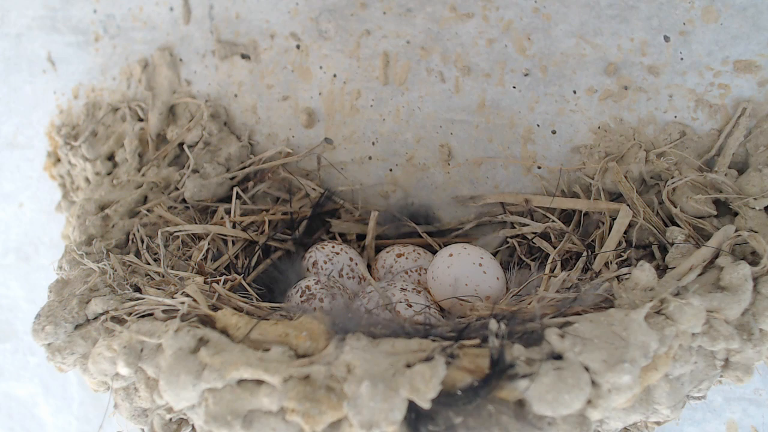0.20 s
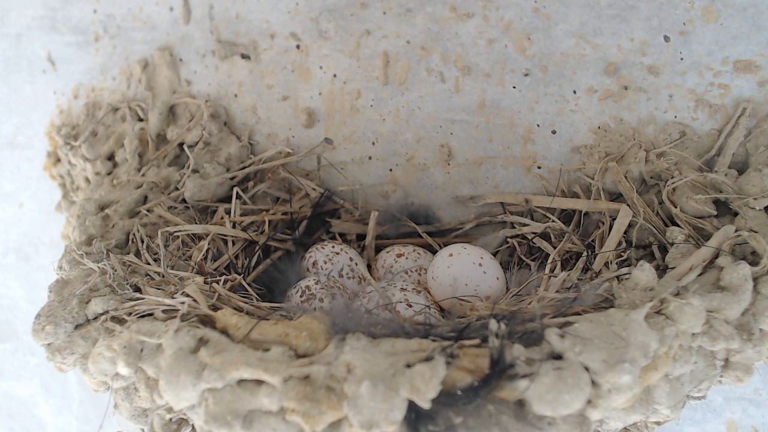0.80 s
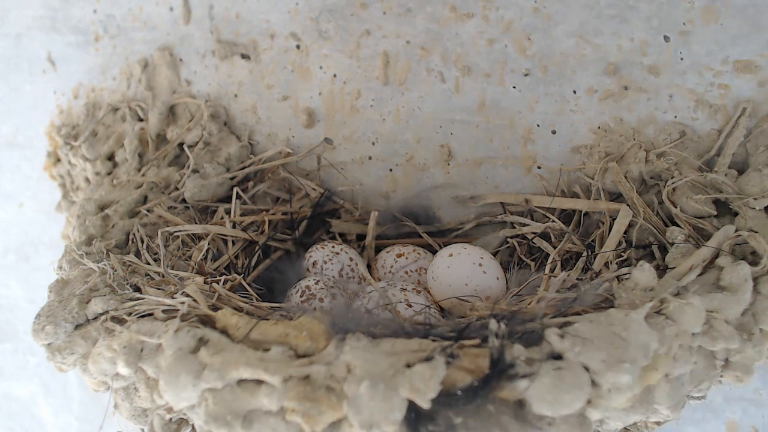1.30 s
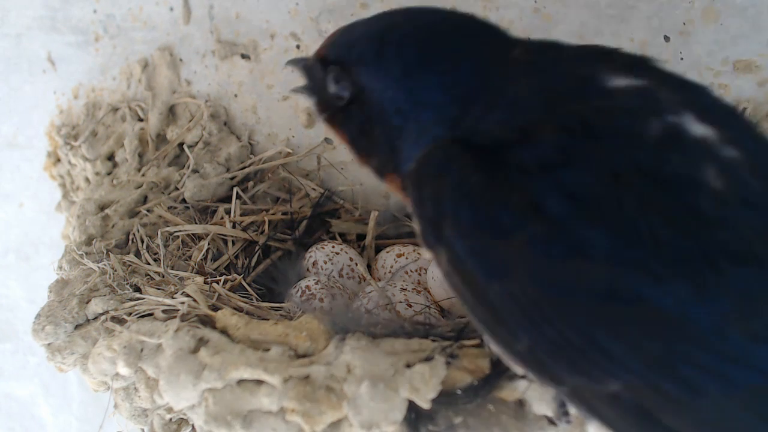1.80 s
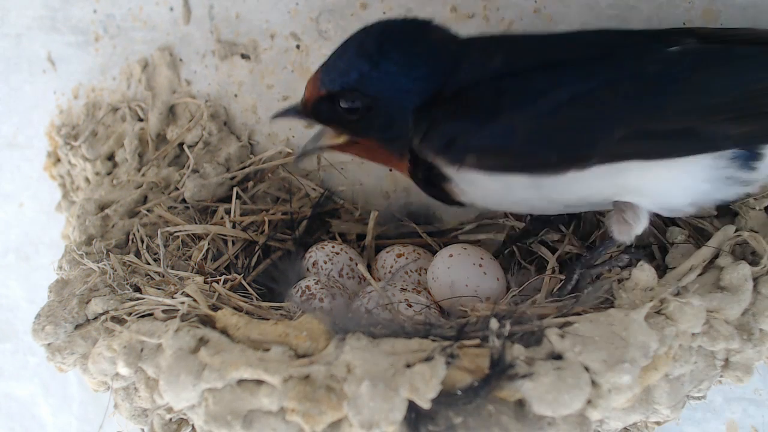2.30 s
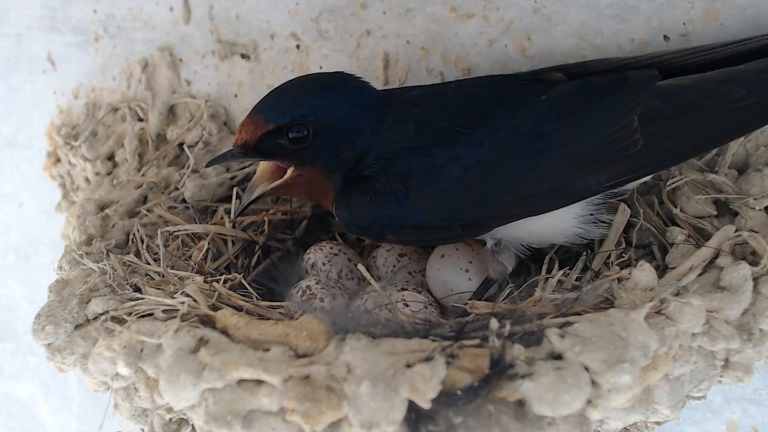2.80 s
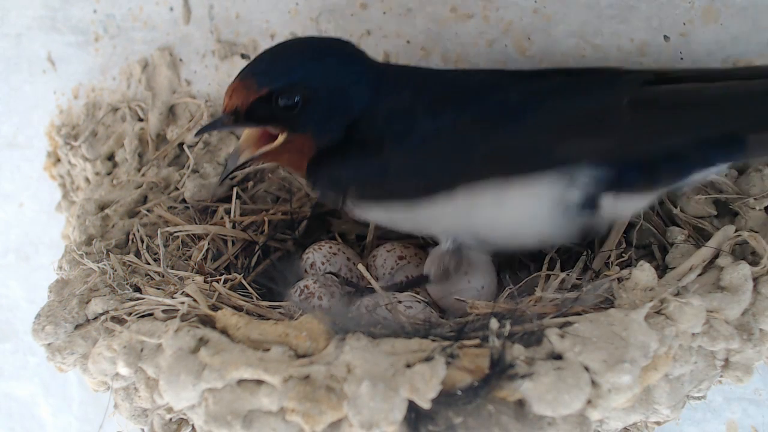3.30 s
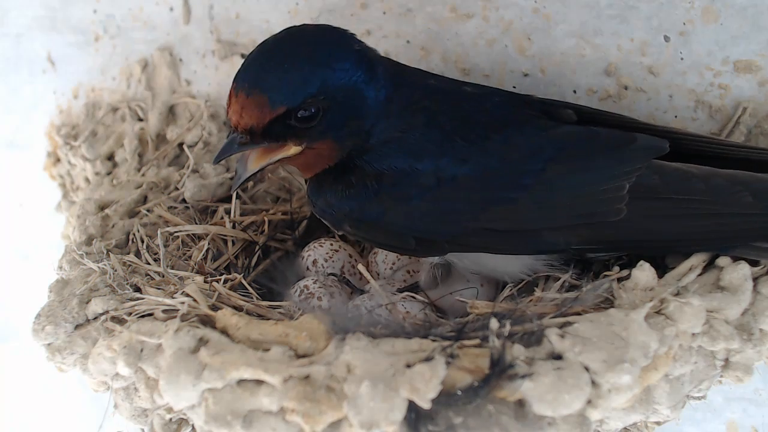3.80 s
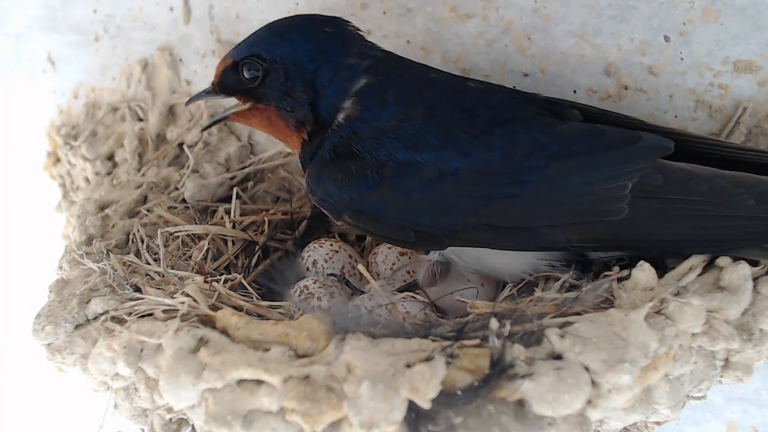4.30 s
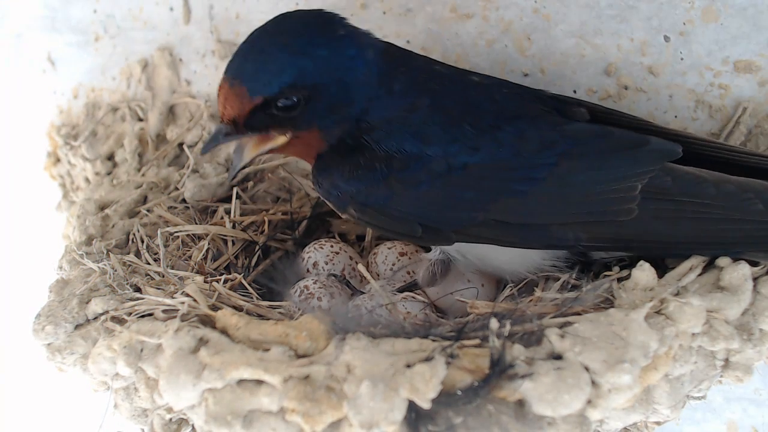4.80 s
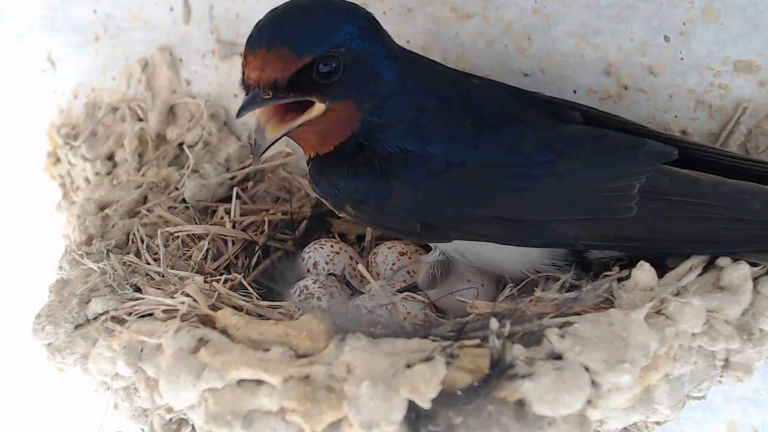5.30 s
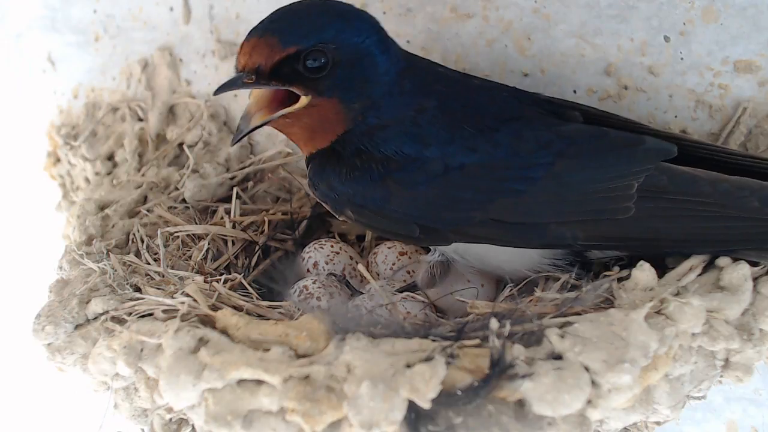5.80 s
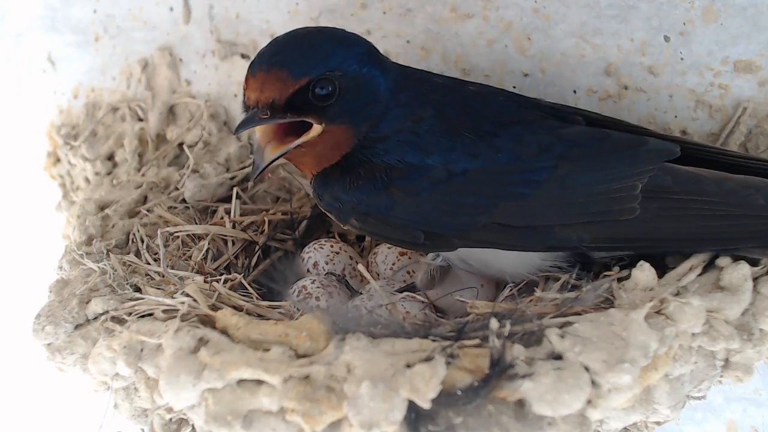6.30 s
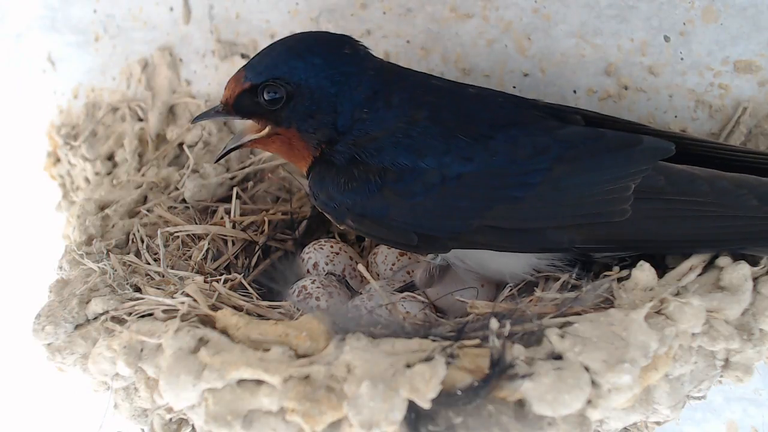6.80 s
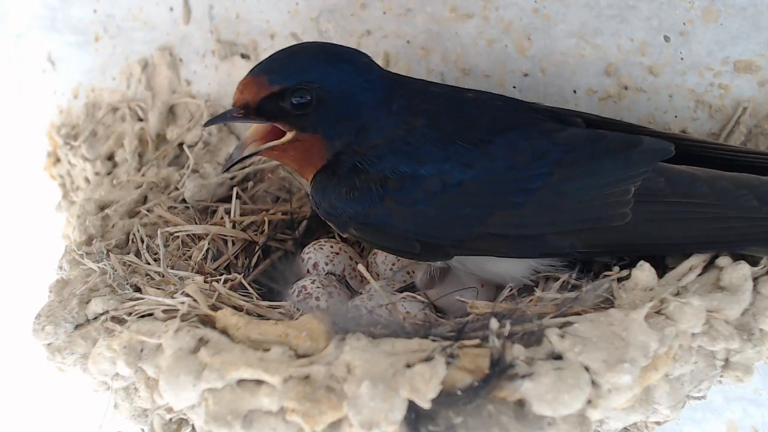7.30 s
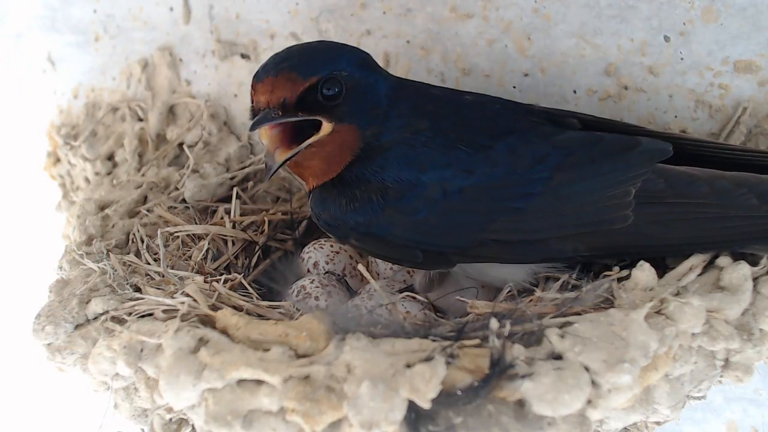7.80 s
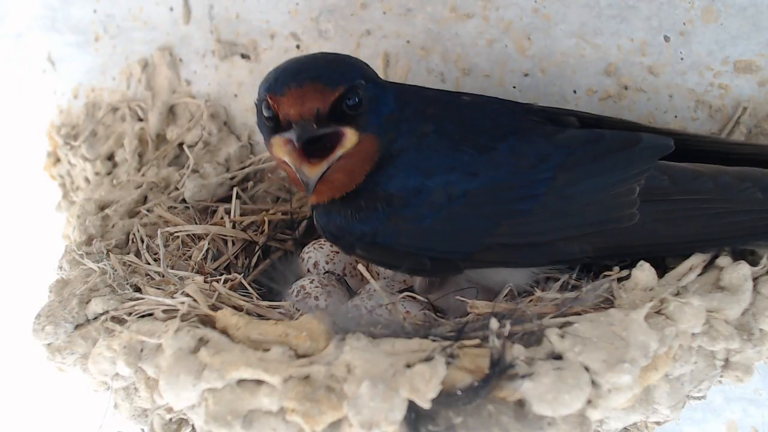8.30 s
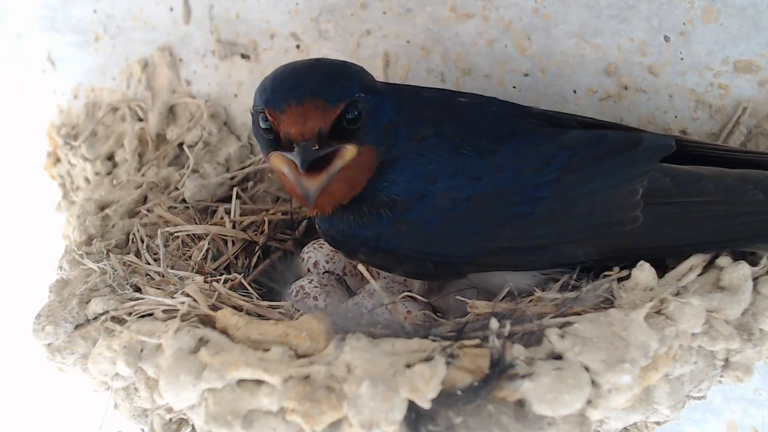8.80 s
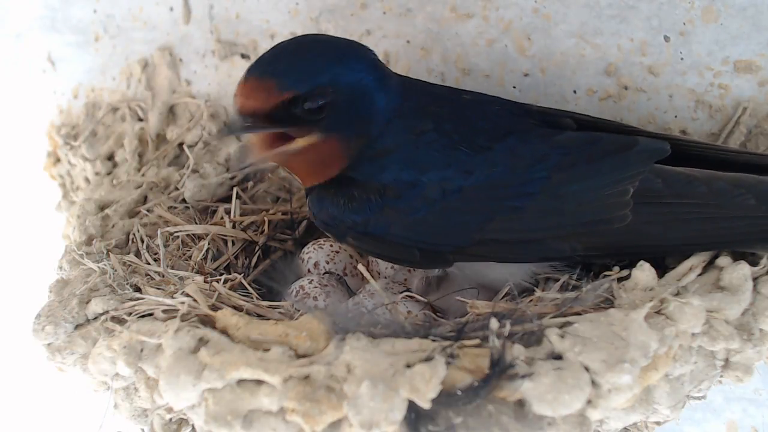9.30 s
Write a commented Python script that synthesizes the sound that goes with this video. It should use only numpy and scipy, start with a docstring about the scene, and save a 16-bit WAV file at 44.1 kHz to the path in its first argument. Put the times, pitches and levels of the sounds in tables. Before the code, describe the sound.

Faint chirps and a burst of wingbeats, then a swallow's harsh, high twittering right beside the microphone.

```python
"""A quiet porch, a stereo microphone right beside a mud nest, a light draught on the capsules.
A barn swallow calls as it flies in, brakes with a burst of wingbeats and scolds from the nest, close left.
The two sides of its syrinx swing chaotically: long rasps that start in a stutter and lock into short
pure glides. The beak colours the voice; the walls answer faintly."""
import sys
import numpy as np
from scipy import signal
from scipy.fft import rfft, irfft, next_fast_len
from scipy.io import wavfile
from scipy.ndimage import uniform_filter1d

SR = 44100
rng = np.random.default_rng(int(sys.argv[2]) if len(sys.argv) > 2 else 0)


def to_wav(s):
    """Save 16-bit WAV."""
    ch = np.atleast_2d(s).T  # columns
    pcm = np.round(np.clip(ch, -1, 1) * 32767)  # PCM
    wavfile.write(sys.argv[1], SR, pcm.astype(np.int16))


N = 420713
TIME = np.arange(N) / SR


def undb(db):
    """Decibels to gain."""
    return np.exp(np.asarray(db) * (np.log(10) / 20))


def unit(x):
    """Scale to rms 1."""
    return x / np.sqrt(np.mean(x ** 2))


def curve(points):
    """Join (time_s, value) points by straight lines."""
    return np.interp(TIME, *np.transpose(points))


def colour(x, spectrum):
    """Filter by (freq_hz, gain_db) points on a log-frequency axis."""
    size = next_fast_len(N, real=True)
    hz, db = np.transpose(spectrum)
    gain = undb(np.interp(np.log(np.fft.rfftfreq(size, 1 / SR) + 1), np.log(hz), db))
    return irfft(rfft(x, size) * gain, size)[:N]


def noise(spectrum):
    """Coloured noise of rms 1."""
    return unit(colour(rng.standard_normal(N), spectrum))


def wander(hz, step=4):
    """Random motion up to about hz, spread 1, drawn every few samples and joined by lines."""
    lowpass = signal.butter(2, hz, fs=SR / step, output="sos")
    slow = signal.sosfilt(lowpass, rng.standard_normal(N // step + 2))
    return uniform_filter1d(np.repeat(unit(slow), step), step)[:N]


def span(start, end):
    """Sample numbers between two times."""
    return np.arange(max(int(start * SR), 0), min(int(end * SR), N))


def fade(i, rise_s, fall_s):
    """Envelope over a run of samples, with straight edges."""
    t = np.arange(len(i)) / SR
    return np.clip(t / rise_s, 0, 1) * np.clip((len(i) / SR - t) / fall_s, 0, 1)


# Outdoor hush around the porch: freq_hz, gain_db
HUSH_SPECTRUM = [(20,-4.5),(55,-6),(130,-3),(300,-17),(700,-21),(1300,-17),(1900,-21.5),(2800,-22.5),(3500,-13.5),(5000,-19.5),(6900,-32),(8000,-55)]
# Gusts on the microphone: time_s, half_width_s, level_db
GUSTS = [(.3, 0.19, -65.5), (.73, 0.19, -54), (1.3, 0.25, -45.5), (2.451, 0.5, -61), (6.95, 0.3, -58),
         (8.501, 0.27, -64.5), (9.252, 0.84, -63)]


def air(hush_db=-70, calm_db=-76.5):
    """Quiet outdoor air, and a draught that rumbles on the capsules, partly alike in both."""
    draught = undb(calm_db) + sum(undb(db) * np.exp(-((TIME - s) / width) ** 2) for s, width, db in GUSTS)
    rumble_spectrum = [(15, -1.5), (55, 0.5), (100, -8.5), (200, -16), (500, -27.5), (2000, -56.5)]
    sides = np.array([[.6], [-.6]])
    hush = noise(HUSH_SPECTRUM) + sides * noise(HUSH_SPECTRUM)
    rumble = noise(rumble_spectrum) + sides * noise(rumble_spectrum)
    return undb(hush_db) * unit(hush) + draught * undb(3.9 * wander(8.2)) * unit(rumble)


def porch(x, t60_s=0.38, wet_db=-26):
    """A faint diffuse echo from the walls, different at each capsule."""
    t = np.arange(int(.6 * SR)) / SR
    tail = rng.standard_normal((2, len(t))) * undb(-60 * t / t60_s) * np.clip(t / .006, 0, 1)
    tail /= np.sqrt(np.sum(tail ** 2, axis=1, keepdims=True))
    return undb(wet_db) * signal.fftconvolve(x[None], tail, axes=1)[:, :N]


# Wingbeats arriving at the microphone: time_s, level_db
WINGBEATS = [(0.699, -43), (0.751, -41), (.814, -48), (0.885, -49), (0.927, -40), (0.968, -38.5),
             (1.044, -32.5), (1.11, -30), (1.187, -27.5), (1.254, -21.5), (1.311, -22.5), (1.376, -27.5),
             (1.426, -29.5), (1.482, -25.5), (1.541, -36.5), (1.593, -35), (1.652, -32.5), (1.715, -46)]
# Feathers and claws brushing the nest: time_s, length_s, level_db
BRUSHES = [(1.051, 0.0093, -50), (1.109, 0.0032, -34.5), (1.113, 0.025, -47.5), (1.122, 0.0023, -26.5),
           (1.2, 0.022, -47.5), (1.314, 0.0032, -54), (1.48, 0.0028, -47), (1.537, 0.0016, -57),
           (1.593, .003, -57), (2.109, 0.0034, -47), (2.349, 0.0051, -43)]
# Feather swish at close range: freq_hz, gain_db
FEATHER_SPECTRUM = [(60,5.5),(300,3),(700,3.5),(1300,-0.5),(2000,-6),(3500,-9.5),(7000,-39.5)]


def wings(push_s=0.0029, swish_s=0.013, push_db=1, swish_db=-29, eddy_db=-9):
    """Each stroke shoves air at the capsules, a push and a pull, with eddies and a swish of feathers."""
    push, eddies, swish = np.zeros((3, N))
    for s, db in WINGBEATS:
        i = span(s - .05, s + .06)
        t = TIME[i] - s
        push[i] += undb(db + push_db) * t / push_s * np.exp(-.5 * (t / push_s) ** 2)
        eddies[i] += undb(db + eddy_db) * np.exp(-np.abs(t) / 0.0096)
        swish[i] += undb(db + swish_db) * np.exp(-.5 * ((t - .006) / swish_s) ** 2)
    for s, length, db in BRUSHES:
        i = span(s - .03, s + .03)
        swish[i] += undb(db) * np.exp(-(2 * (TIME[i] - s) / length) ** 2)
    # a flight feather buzzes for a moment as the bird brakes
    buzz = undb(-29.5) * np.exp(-((TIME - 1.204) / 0.0051) ** 2) * np.sin(2 * np.pi * 435 * TIME)
    eddy_spectrum = [(20, -3), (70, 3), (180, -5), (400, -17.5), (1500, -60)]
    return np.array([push + buzz + undb(side_db) * swish * noise(FEATHER_SPECTRUM)
                     + eddies * noise(eddy_spectrum) for side_db in (2, -2)])


# Breath under the voice, heard from close by: freq_hz, gain_db
HUSK_SPECTRUM = [(60,-2),(200,1),(450,-2),(800,2),(1400,0),(1750,-3),(2150,-7.5),(2600,0.5),(3500,-29.5)]


def husk(voice, husk_db=-21):
    """Air forced through the syrinx adds a low husk that follows the strength of the voice."""
    weighted = colour(voice, [(3900, -1.6), (4700, -0.27)])
    strength = np.sqrt(np.abs(uniform_filter1d(weighted ** 2, size=120)))
    return undb(husk_db) * strength * noise(HUSK_SPECTRUM)


# Short calls on the way in, off microphone: start_s, end_s, level_db
FLIGHT_CALLS = [(.01, 0.051, -70.5), (0.108, 0.191, -72), (0.287, 0.324, -65), (0.365, .412, -72),
                (.416, .453, -63), (0.518, 0.581, -63), (.634, 0.706, -66.5), (0.733, 0.845, -62.5),
                (0.895, .997, -62)]
# Rasps at the nest, on microphone; low_db (low side) and beak_db are relative to level_db:
# start_s, end_s, climb_s, level_db, swell_db, pitch_hz, low_db, beak_db,
# closing_hz, closing_slide_hz, closing_db
NEST_CALLS = [(1.636, 1.721, 0.014, -57.5, -8, 4700, 10, -2.5, 2683, 361, -44.5),
              (1.74, 1.943, 0.038, -54, 14, 4430, 8, 0, 2966, 398.5, -42.5),
              (2.029, 2.118, 0, -53, 5, 4300, 8.5, -1, 3115, 697.5, -50),
              (2.12, 3.014, .024, -39.5, 0.5, 4440, -5, -8.5, 3499, -380, -39.5),
              (3.105, 3.646, 0.089, -40.5, 5, 4450, -5, -6, 3440, 150.5, -42.5),
              (3.765, 4.149, 0.091, -40.5, 2, 4390, -2.5, -4.5, 3500, 117, -40.5),
              (4.258, 4.304, 0.018, -57, 2.5, 4380, 0.5, -8, 3426, -400, -54.5),
              (4.352, 4.617, 0.083, -38.5, 2.5, 4600, -13.5, -14.5, 3340, 97.5, -52.5),
              (4.722, 4.845, 0.12, -41, 3, 4400, -4.5, -6.5, 3470, -170, -42),
              (4.988, 5.066, 0.044, -53.5, 1, 4100, 9, 1.5, 3530, -300, -48),
              (5.08, 5.496, .022, -42, 7, 4320, .5, -1, 3506, 217.5, -38.5),
              (5.597, 6.499, 0.098, -41, -1, 4380, -1.5, -1.5, 3136, 87, -43.5),
              (6.61, 7.39, .11, -37, 3.5, 4570, -11, -13, 3296, 200.5, -39.5),
              (7.495, 7.941, .11, -38, 5.5, 4380, -3, -5, 3380, -240, -40.5),
              (8.056, 8.288, 0.073, -41.5, 2.5, 4400, 3, 0.5, 3380, -660, -46),
              (8.344, 8.469, 0.063, -38.5, 9, 4400, -2, -3.5, 3490, 518.5, -37),
              (8.532, 8.652, 0.047, -37.5, 12, 4450, -0.5, -2.5, 3494, 564.5, -36.5),
              (8.712, 8.829, 0.044, -35.5, 11.5, 4480, -3.5, -4, 3693, 396, -29),
              (8.885, 8.975, .05, -35.5, 6.5, 4250, -5.5, -5, 3720, 599, -30),
              (9.027, 9.13, 0.044, -36.5, 1.5, 4330, -5, -9, 3735, 310, -32),
              (9.235, 9.517, 0.076, -37.5, 2.5, 4420, -1.5, -5, 3380, -200, -45.5)]


def calls(swell_db=5, pitch_hz=4280, low_db=2.5, beak_db=-5.5, closing_hz=3590, slide_hz=-400):
    """Every call as a full row: those in flight, all shaped by these settings, then those at the nest."""
    return [(start, end, 0, db, swell_db, pitch_hz, low_db, beak_db, closing_hz, slide_hz, db + 7)
            for start, end, db in FLIGHT_CALLS] + list(NEST_CALLS)


def closing_notes(length_s=0.017, overhang_s=.002, bend_hz=60, rise_share=.4, climb_hz_per_s=30000):
    """The low side ends each call on a short pure note, longer if it slides upwards."""
    notes = []
    for _, end, *_, hz, slide_hz, db in calls():
        stop = end + overhang_s
        start = stop - length_s - max(slide_hz, 0) / climb_hz_per_s
        notes.append((start, stop, hz, slide_hz, bend_hz, rise_share, db))
    return notes


# Arched whistles, in flight and at the nest: start_s, pitch_hz, level_db
ARCHES = [(0.239, 4250, -59), (.372, 4160, -60), (0.514, 4050, -60.5), (.766, 3946, -60),
          (0.901, 3930, -50.5), (.958, 3620, -55), (1.296, 4740, -63), (1.297, 3350, -65.5),
          (1.368, 3240, -64.5), (1.372, 4780, -62.5), (1.552, 2646, -53), (2.17, 4000, -40.5),
          (3.103, 4430, -44), (4.254, 3150, -59), (7.494, 4410, -44.5), (7.539, 4133, -45),
          (8.346, 4383, -46), (8.717, 4930, -51), (8.762, 4590, -33.5), (8.896, 5200, -44),
          (9.04, 4445, -33.5), (9.24, 4080, -45)]
# Rising whistles at the nest: start_s, end_s, pitch_hz, slide_hz, level_db
SCOOPS = [(1.696, 1.736, 3840, 1400, -58), (1.761, 1.8, 4000, 1090, -46.5),
          (1.762, 1.802, 2600, 1040, -55.5), (1.878, 1.927, 4200, 660, -43),
          (2.071, 2.108, 2470, 698, -50.5), (2.084, 2.122, 4073, 1220, -36.5),
          (2.461, 2.487, 1910, 493.2, -58.5), (2.551, 2.574, 1900, 500, -60),
          (3.171, 3.232, 4310, 220, -45.5), (3.606, 3.633, 4470, 270, -34), (3.846, 3.93, 4342, 397, -41),
          (4.596, 4.613, 4530, 530, -38.5), (6.473, 6.499, 4313, 200, -36), (6.499, 6.523, 3210, 740, -52),
          (7.366, 7.383, 4424, 190, -31), (8.607, 8.64, 4840, 490, -30), (8.782, 8.819, 4710, 700, -26),
          (8.931, 8.965, 4875, 340, -31.5), (9.024, 9.045, 3922, 701, -39.5),
          (9.078, 9.118, 4518, 350, -24), (9.331, 9.366, 4356, 362, -33)]


def whistles(arch_s=.031, arch_slide_hz=-150, arch_bend_hz=210, scoop_bend_hz=-170):
    """Notes for glides(): arches speak quickly, scoops swell for a larger share of their length."""
    arches = [(s, s + arch_s, hz, arch_slide_hz, arch_bend_hz, .18, db) for s, hz, db in ARCHES]
    scoops = [(start, end, hz, slide, scoop_bend_hz, .4, db) for start, end, hz, slide, db in SCOOPS]
    return arches + scoops


# Steady tones of the low side, at the nest: start_s, end_s, pitch_hz, level_db
HELD_TONES = [(5.061, 5.087, 3300, -55.5), (5.395, 5.472, 3579, -48.5), (8.148, 8.265, 3525, -43.5)]
# How the beak passes the octave of a pure note: freq_hz, gain_db
OCTAVE_RESPONSE = [(4600, -11), (5400, 0.5), (6200, 0.5), (6750, 1), (7100, -12), (7450, -23.5),
                   (8000, -43)]


def glides(jitter_hz=75, shimmer_db=2.33, difference_db=8, release_s=.006):
    """The labia lock into pure arcs whose octave rings the beak; two at once add a difference tone."""
    tone, octave = np.zeros((2, N))
    jitter, shimmer = jitter_hz * wander(330), shimmer_db * wander(200)
    held = [(start, end, hz, 0, 0, .4, db) for start, end, hz, db in HELD_TONES]
    for start, end, hz, slide_hz, bend_hz, rise_share, db in closing_notes() + whistles() + held:
        i = span(start, end)
        along = np.linspace(-.5, .5, len(i))
        arc = hz + slide_hz * along - bend_hz * (2 * along) ** 2
        sag = 1 - 0.064 * np.exp((TIME[i] - end) / 0.0022)  # the pitch drops as the pressure lets go
        phase = 2 * np.pi * np.cumsum(arc * sag + jitter[i]) / SR
        envelope = unit(fade(i, rise_share * (end - start), release_s))
        swell = np.sqrt(2) * envelope * undb(db + shimmer[i])
        tone[i] += swell * np.sin(phase)
        octave[i] += swell * np.sin(2 * phase)
    difference = undb(difference_db) * colour(tone ** 2, [(500, -60), (1100, 0), (1800, 0), (3000, -60)])
    return tone + colour(octave, OCTAVE_RESPONSE) + difference


def give_way(notes, depth_db=-10):
    """Gain of the rasp, which recedes while the labia lock into these pure notes."""
    lock = np.zeros(N)
    for start, end, *_ in notes:
        i = span(start, end)
        lock[i] = np.maximum(lock[i], fade(i, 0.036, .002))
    return undb(depth_db * lock)


def effort(rise_s=.055):
    """Pressure climbs to full voice, lifting pitch and level; the low side needs less and leads early."""
    pitch, level, low, beak = np.zeros((4, N))
    for start, end, climb_s, db, swell_db, hz, low_db, beak_db, *_ in calls():
        i = span(start, end)
        soft = np.clip((start + climb_s - TIME[i]) / rise_s, 0, 1)
        along = np.linspace(-.5, .5, len(i))
        pitch[i] = hz - 151.7 * soft + 90.9 * along
        level[i] = db - 9.5 * soft + swell_db * along
        low[i] = low_db + 3.5 * soft + 2 * along
        beak[i] = beak_db + 2 * along  # the beak opens through the call
    level -= 2.5 * np.exp(-((TIME - 2.493) / 0.13) ** 2)  # one sag as the bird settles
    pitch += 44.87 * wander(12.06)
    return pitch, level, low, beak


def valve(kick=0.26, open_s=.0016, shut_s=.0035):
    """The syrinx pops open for each call; at low pressure it catches and stalls in millisecond bursts."""
    gate = np.zeros(N)
    stall_hz = 135 * np.exp(.45 * wander(90))
    for start, end, climb_s, *_ in calls():
        i = span(start, end)
        gate[i] = fade(i, open_s, shut_s) * (1 + kick * np.exp(-(TIME[i] - start) / 0.003))
        stutter = span(start + .012, start + climb_s / 2)
        swing = -np.sin(2 * np.pi * np.cumsum(stall_hz[stutter]) / SR)
        gate[stutter] *= np.clip(3 * swing + 1.4, .18, 1.2)
    return gate


def labium(hz, spread_hz, chaos_hz, flutter_db):
    """One side of the syrinx in chaos: its level flutters and its pitch leaps every few cycles."""
    phase = 2 * np.pi * np.cumsum(hz + spread_hz * wander(chaos_hz)) / SR
    return unit(np.sin(phase) * undb(flutter_db * wander(930)))


# Middle pitch of the syrinx's low side: time_s, pitch_hz
LOW_SIDE_PITCH = [(1.0,3580),(1.6,2755),(1.9,3185),(2.25,3672),(9.54,3725)]
# Resonance of the throat: freq_hz, gain_db
THROAT_RESPONSE = [(1000,-33.5),(2000,-7.5),(2600,-3),(3100,-0.5),(3350,-5),(3650,0),(4100,1),(4650,0),(5050,-3.5),(5500,-5),(7000,-16.5),(8000,-35)]
# Ring of the open beak: freq_hz, gain_db
BEAK_SPECTRUM = [(4700,-28.5),(5150,-10.5),(5500,-2.5),(5900,-1),(6350,1),(6700,-8),(7100,-13),(7500,-24),(8000,-54)]


def rasp():
    """Both sides swing at once in chaos; their collisions ring the open beak."""
    pitch_hz, level_db, low_db, beak_db = effort()
    lift_hz = pitch_hz - 4400  # moves both sides, the high one further
    # the weaker the low side, the less it throws the high side about
    coupling = np.clip(1 + 0.02544 * low_db, .6, 1.1)
    high_side = labium(4450 + 1.2 * lift_hz, spread_hz=340 * coupling, chaos_hz=692.7, flutter_db=4)
    low_side = labium(curve(LOW_SIDE_PITCH) + .4 * lift_hz, spread_hz=450, chaos_hz=909, flutter_db=-1)
    rattle = undb(1.3 * wander(220))
    whistle_dip = give_way(whistles())
    tone = colour(high_side * rattle * whistle_dip + undb(low_db - 0.32) * low_side, THROAT_RESPONSE)
    beak = undb(beak_db + 1.1) * noise(BEAK_SPECTRUM) * np.sqrt(whistle_dip)
    return (tone + beak) * undb(level_db + .6 * wander(40)) * valve() * give_way(closing_notes())


# The nest shades the right capsule: freq_hz, loss_db
NEST_SHADE = [(100,14.5),(500,8.5),(1500,9),(2600,5.5),(3200,6),(3700,8),(4600,5),(5100,4.5),(5700,10),(6300,10.5),(7500,-2)]
# The head turning in front of the microphone: time_s, leftward_db
HEAD_TURN = [(.5,4),(1.6,0.5),(2.7,2),(4.1,2.5),(4.55,3.5),(5.2,1),(5.9,1),(6.8,3),(7.3,3),(7.7,1),(8.4,-0.5),(8.85,-1),(9.1,2.5),(9.5,0)]


def close_pickup(voice, near_db=3.5, lag_samples=1.8):
    """The direct voice reaches the left capsule first, the right one late and shaded by the nest."""
    turn_db = curve(HEAD_TURN)
    late = np.interp(np.arange(N) - lag_samples, np.arange(N), voice)
    shaded = colour(late, [(hz, -db) for hz, db in NEST_SHADE])
    return np.array([voice * undb(near_db + turn_db / 4), shaded * undb(near_db - 0.78 * turn_db)])


def scene(flight_echo_db=11, pure_husk_db=-7):
    """The swallow over wings and air; until it lands, the porch echo takes a larger share."""
    rough, pure = rasp(), glides()
    voice = rough + pure + husk(rough + undb(pure_husk_db) * pure)
    echo_db = curve([(1.3, flight_echo_db), (1.7, 0)])
    return close_pickup(voice) + porch(voice * undb(echo_db)) + wings() + air()


def record(dry, top_hz=8150):
    """The recorder cuts the top steeply."""
    return signal.sosfilt(signal.ellip(10, .2, 70, top_hz, fs=SR, output="sos"), dry)


dry = scene()
out = record(dry)
to_wav(out)
```